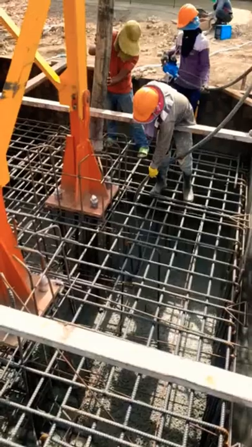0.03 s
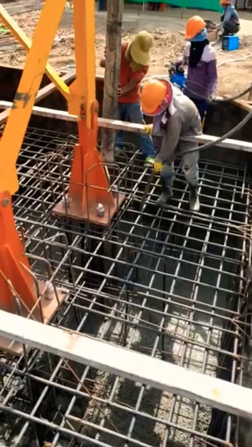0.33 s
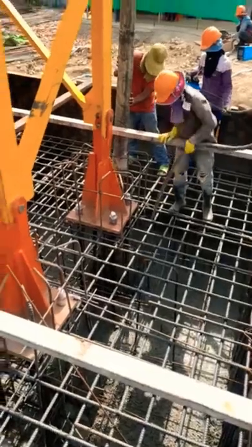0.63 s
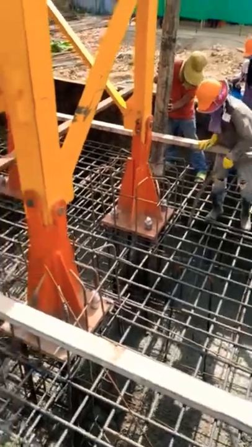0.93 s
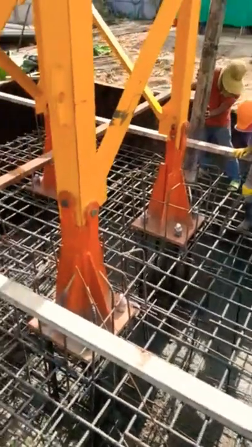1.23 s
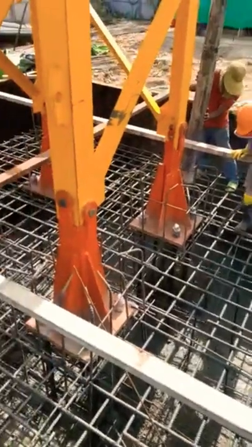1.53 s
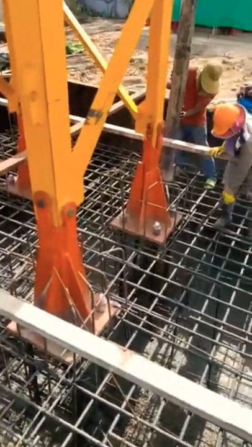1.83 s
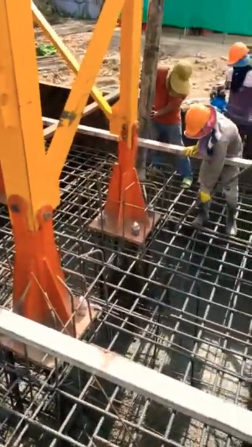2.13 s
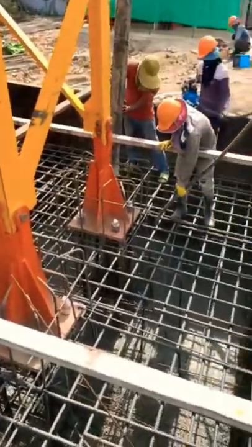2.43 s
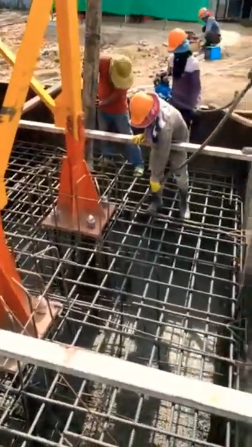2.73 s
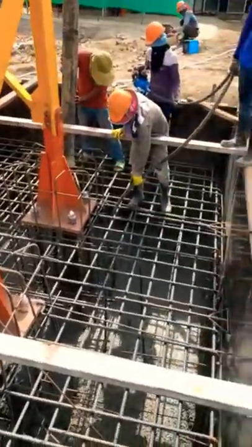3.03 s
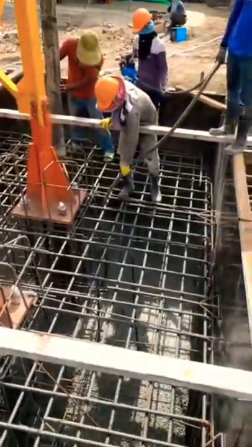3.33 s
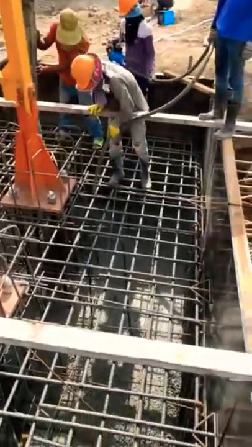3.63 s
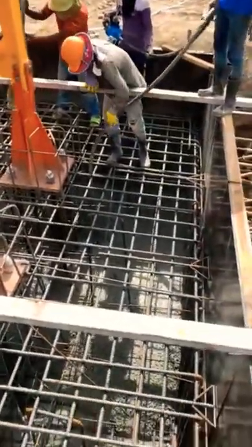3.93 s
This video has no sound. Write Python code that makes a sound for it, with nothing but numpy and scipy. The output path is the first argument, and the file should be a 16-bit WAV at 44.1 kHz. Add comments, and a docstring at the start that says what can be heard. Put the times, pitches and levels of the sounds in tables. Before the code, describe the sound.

A concrete poker vibrator hums and rattles against steel mesh over a rumbling engine.

```python
"""Concrete being compacted in a pit of reinforcing steel, outdoors, a few metres away.
From the start a poker vibrator hums at about 215 turns/s: the mesh sizzles, gravel churns, loose
bars clatter, and the small driving engine rumbles underneath. Hollow swells begin at 0.6 s; at 0.7 s
steel squeals on steel and a low groan falls. From 1.7 s the poker bears harder in short surges.
Two more groans follow at 2.2 and 2.7 s, and a second squeal at 3.9 s."""
import sys
import numpy as np
from scipy import signal
from scipy.fft import rfft, irfft
from scipy.io import wavfile

SR = 44100
rng = np.random.default_rng(int(sys.argv[2]) if len(sys.argv) > 2 else 0)


def unload_audio(sound):
    """Save the sound as a 16-bit wav file, at the path given as the first command line argument."""
    columns = np.transpose(np.atleast_2d(sound))
    # keep every value between -1 and 1, then stretch to whole-number steps
    steps = np.round(np.clip(columns, -1, 1) * 32767)
    wavfile.write(sys.argv[1], SR, steps.astype(np.int16))


N = 176400
T = np.arange(N) / SR


def amp(db):
    """dB to gain."""
    return 10 ** (np.asarray(db) / 20)


def unit(x):
    """Scale to unit rms."""
    return x / np.sqrt(np.mean(x ** 2) + 1e-20)


def curve(points):
    """Linear interpolation of (time_s, value) points."""
    return np.interp(T, *np.transpose(points))


def drift(rate_hz):
    """Smooth noise up to about rate_hz; unit rms."""
    hz = np.fft.rfftfreq(N, 1 / SR)
    spectrum = rfft(rng.standard_normal(N))
    return unit(irfft(spectrum * np.exp(-.5 * (hz / rate_hz) ** 2) * (hz > 0), N))


def angle(hz):
    """Running phase of a frequency curve, rad."""
    return 2 * np.pi * np.cumsum(hz) / SR


def smeared(phase, width_hz):
    """Tone blurred into a narrow band; unit rms."""
    return unit(drift(width_hz / 2) * np.cos(phase) + drift(width_hz / 2) * np.sin(phase))


def colour(x, points):
    """Minimum-phase filter through (freq_hz, gain_db) points; unit rms."""
    hz, db = np.transpose(points)
    log_hz = np.log(abs(np.fft.fftfreq(N, 1 / SR)) + 1)
    log_gain = np.log(amp(np.interp(log_hz, np.log(hz), db)))
    response = np.exp(np.conj(signal.hilbert(log_gain)))[:N // 2 + 1]
    return unit(irfft(rfft(x) * response, N))


def impacts(turn, per_s, spread_db, lock=.22):
    """Random blows of uneven size, crowding on one part of each turn."""
    chance = per_s / SR * (1 + lock * np.cos(turn))
    size = amp(spread_db * np.minimum(rng.exponential(1, N), 4))
    return (rng.random(N) < chance) * size * rng.choice([-1, 1], N)


def pit(blows, places, t60_s=.15, reflection_db=1):
    """Blows scattered over places in the pit, each with its own short reflections."""
    t = T[:SR // 5]
    place = rng.integers(0, places, N)
    out = blows.copy()
    for k in range(places):
        tail = rng.standard_normal(len(t)) * np.exp(-np.log(1000) * t / t60_s)
        tail /= np.linalg.norm(tail)
        out += amp(reflection_db) * signal.oaconvolve(blows * (place == k), tail)[:N]
    return out


# Poker speed: time_s, speed_hz
POKER_SPEED = [(.13, 207.4), (.3, 216.7), (.5, 220.5), (.68, 211.9), (1.0, 215.6), (1.45, 216.5),
               (1.9, 212), (2.05, 214.4), (2.25, 210.2), (2.55, 215.2), (2.72, 213.4), (2.95, 217.9),
               (3.4, 217), (3.6, 213.4), (3.8, 218), (4, 221)]


def rotation(wobble_hz=2.2):
    """Angle of the poker's spinning weight, rad."""
    return angle(curve(POKER_SPEED) + wobble_hz * drift(10))


# Fundamental, before trim: time_s, level_db
HUM_LEVEL = [(.14, -29), (.21, -27.5), (.32, -31.5), (.41, -29.5), (.45, -37), (.51, -26), (.62, -38),
             (.72, -24), (.78, -38), (.87, -43), (.92, -37), (1.0, -25), (1.08, -33), (1.16, -24.5),
             (1.23, -37), (1.3, -31), (1.55, -24), (1.8, -24.5), (1.92, -18), (1.98, -30), (2.06, -20),
             (2.22, -23.5), (2.32, -31.5), (2.4, -23), (2.48, -31), (2.58, -19), (2.65, -34), (2.7, -23),
             (2.84, -40), (2.92, -19.5), (3.1, -23.5), (3.45, -26), (3.49, -40), (3.59, -23), (3.66, -35),
             (3.81, -17), (3.91, -33), (3.98, -20.5)]
# Second harmonic: time_s, level_db
OCTAVE_LEVEL = [(.13, -48), (.54, -49.5), (.75, -36), (.95, -41.5), (1.25, -42), (2.25, -45), (2.6, -42),
                (2.93, -37), (3.2, -44), (3.45, -50), (3.57, -35), (3.75, -37), (3.9, -42), (4, -41)]


def poker(turn, trim_db=-4, flutter_db=1.13, edge_db=-40):
    """The spinning weight hums, with a rough edge and a rough octave."""
    tone = unit(np.sin(turn) * amp(flutter_db * drift(15)))
    hum = amp(curve(HUM_LEVEL) + trim_db) * tone
    edge = amp(edge_db) * smeared(turn, width_hz=30.4)
    octave = amp(curve(OCTAVE_LEVEL)) * smeared(2 * turn, width_hz=26)
    return hum + edge + octave


# Steady rattle: time_s, gain_db
CONTACT_GAIN = [(.13, -2), (.27, -2.5), (.33, 0.5), (.45, -1.7), (.68, -1), (.8, -0.5), (.93, -1),
                (1.03, 1.8), (1.12, -2.5), (1.3, -3), (1.39, -1), (1.46, -2), (1.55, -1.8), (1.68, -2),
                (1.76, -1), (1.93, 2.5), (2.1, 0), (2.35, 0), (2.45, -4), (2.57, -1.5), (2.63, -0.1),
                (2.8, -0.1), (2.95, -3.5), (3.08, -1), (3.25, -1), (3.36, -0.3), (3.47, -0.5), (3.6, 1.3),
                (3.69, -0.8), (3.79, .7), (3.83, -2.5), (3.91, 0), (4, -1)]
# Harder contact: peak_s, half_width_s, boost_db
CONTACT_SURGES = [(1.739, 0.019, 3), (2.149, 0.018, 2.5), (2.702, 0.024, 4), (2.878, .028, 2.5),
                  (3, 0.041, 6), (3.137, 0.019, 1), (3.74, 0.017, 4)]


def contact():
    """How hard the poker bears on the steel, dB."""
    surges_db = sum(db * np.exp(-((T - peak_s) / half_s) ** 2) for peak_s, half_s, db in CONTACT_SURGES)
    return curve(CONTACT_GAIN) + surges_db


# Ringing steel: freq_hz, gain_db
STEEL_SPECTRUM = [(600, -27), (1400, -8.5), (2200, -2), (3000, -5), (4200, -2.5), (4600, -6), (4930, -8.5),
                  (5400, -6), (5800, -1), (6400, 1), (7500, 1.5), (8300, 0), (8900, -9)]


def mesh(turn, contact_db, base_db=-25, flicker_db=.88):
    """Dense strikes on the steel mesh merge into a sizzle that follows the contact."""
    strikes = pit(impacts(turn, per_s=6500, spread_db=1.5), places=14)
    return colour(strikes, STEEL_SPECTRUM) * amp(base_db + contact_db + flicker_db * drift(14))


# Gravel and formwork: freq_hz, gain_db
GRAVEL_SPECTRUM = [(150, -12.5), (300, -0.5), (400, 4.5), (500, 3.5), (650, -1.5), (770, -2.5), (900, -1),
                   (1400, 0), (1750, -3), (2200, -3.5), (2900, -12.5), (4500, -24.5)]
# Churning of gravel and loose bars, before trim: time_s, level_db
CHURN_LEVEL = [(.13, -33.5), (.25, -34.5), (.37, -32.5), (.5, -33), (.68, -31.5), (.78, -33), (1.0, -33.5),
               (1.27, -34.5), (1.6, -32.5), (1.99, -31), (2.33, -32), (2.45, -33), (2.55, -32), (2.65, -31),
               (2.94, -34), (3.01, -33.5), (3.25, -33), (3.33, -31), (3.47, -33.5), (3.7, -32),
               (3.92, -30.5), (4, -32)]


def gravel(turn, contact_db, trim_db=2.5, follow=.27, flicker_db=.9):
    """Gravel knocks in the formwork, slightly louder under harder contact."""
    knocks = pit(impacts(turn, per_s=2000, spread_db=2), places=10)
    level_db = curve(CHURN_LEVEL) + trim_db + follow * contact_db + flicker_db * drift(12)
    return colour(knocks, GRAVEL_SPECTRUM) * amp(level_db)


def clatter(turn, bars=32, low_hz=907, high_hz=1691, t60_s=.039, trim_db=-7.5):
    """Sparse knocks on loose bars; each rings briefly at its own pitch."""
    t = T[:SR // 10]
    envelope = np.sqrt(t) * np.exp(-np.log(1000) * t / t60_s)
    out = np.zeros(N)
    for hz in np.geomspace(low_hz, high_hz, bars):
        ring = envelope * np.sin(2 * np.pi * hz * t)
        out += signal.oaconvolve(impacts(turn, per_s=5, spread_db=2.5), ring)[:N]
    return unit(out) * amp(curve(CHURN_LEVEL) + trim_db)


# Engine tones: shaft_order, level_db
ENGINE_ORDERS = [(1, -39.5), (2, -47), (5, -44.5), (9, -51.5)]
# Engine rumble: freq_hz, gain_db
RUMBLE_SPECTRUM = [(10, -27), (25, -17), (38, -5), (52, 0.5), (70, 1.5), (100, 3), (140, -0.5), (190, 1),
                   (245, -1.5), (310, -9.5), (500, -38), (1500, -67.5)]
# Rumble, before trim: time_s, level_db
RUMBLE_ENVELOPE = [(0.15, -29.5), (0.25, -32.5), (0.89, -28.5), (0.94, -31.5), (1.12, -29.5), (1.24, -34.5),
                   (1.53, -25.5), (1.59, -29.5), (2.24, -29.5), (2.3, -29), (2.33, -31.5), (2.82, -29),
                   (2.84, -30.5), (3.03, -30), (3.23, -33.5), (3.4, -28), (3.48, -32), (3.98, -31.5)]


def engine(shaft_hz=57.8, waver=.01163, flutter_db=2.5, rumble_trim_db=1.26):
    """Wavering shaft orders in a low, lumpy rumble."""
    shaft = angle(shaft_hz * (1 + waver * drift(1.45)))
    tones = np.zeros(N)
    for order, db in ENGINE_ORDERS:
        tone = np.sin(order * shaft + 2 * np.pi * rng.random())
        tones += amp(db) * unit(tone * amp(flutter_db * drift(3.1)))
    rumble = colour(rng.standard_normal(N), RUMBLE_SPECTRUM)
    return tones + rumble * amp(curve(RUMBLE_ENVELOPE) + rumble_trim_db)


# Hollow swells: peak_s, half_width_s, pitch_hz, level_db
SWELLS = [(.63, 0.019, 408, -28), (2.429, 0.019, 428, -29), (2.558, 0.028, 425, -26.5),
          (2.689, .025, 425, -30), (3.022, 0.022, 432, -29.5), (3.1, 0.012, 433, -31),
          (3.409, 0.03, 434, -34), (3.815, 0.023, 404.3, -28)]


def swells():
    """Short hollow tones near the hum's octave."""
    out = np.zeros(N)
    for peak_s, half_s, hz, db in SWELLS:
        envelope = np.exp(-((T - peak_s) / half_s) ** 2)
        out += amp(db) * envelope * unit(np.sin(2 * np.pi * (hz * T + rng.random())))
    return out


# Steel rubbing: start_s, length_s, level_db
RUBS = [(0.713, 0.22, -29), (3.916, 0.21, -26.5)]
# Squeal partials: pitch_hz, gain_db
RUB_PARTIALS = [(6345, 0), (5663, -8)]


def squeals(waver_hz=12, roughness=.55):
    """Thin wavering tones swell and fade as steel rubs on steel."""
    envelope = np.zeros(N)
    for start_s, length_s, db in RUBS:
        envelope += amp(db) * np.sin(np.pi * np.clip((T - start_s) / length_s, 0, 1))
    tones = np.zeros(N)
    for hz, db in RUB_PARTIALS:
        phase = angle(hz + waver_hz * drift(17))
        tones += amp(db) * unit(np.sin(phase) + roughness * smeared(phase, width_hz=190))
    return envelope * tones


# Groans: start_s, length_s, start_pitch_hz, level_db
FALLING_TONES = [(.72, 0.16, 243, -28), (2.176, 0.19, 208, -31.5), (2.671, 0.123, 214.8, -28)]


def groans(sag=.67, bend_power=3.8):
    """Low tones hold their pitch, then slide down as they fade."""
    out = np.zeros(N)
    for start_s, length_s, hz, db in FALLING_TONES:
        progress = np.clip((T - start_s) / length_s, 0, 1)
        phase = angle(hz * (1 - sag * progress ** bend_power)) + 2 * np.pi * rng.random()
        envelope = np.sqrt(4 * progress * (1 - progress))
        out += amp(db) * envelope * unit(np.sin(phase))
    return out


def scene():
    """Mono mix; the poker's rotation drives both hum and rattle."""
    turn = rotation()
    contact_db = contact()
    hum = poker(turn)
    rattle = mesh(turn, contact_db) + gravel(turn, contact_db) + clatter(turn)
    return (hum + rattle + engine() + swells() + squeals() + groans())[None]


def record(dry, start_s=.13, rise_s=.002, cutoff_hz=8950):
    """Abrupt onset, steep low-pass."""
    gate = np.clip((T - start_s) / rise_s, 0, 1)
    lowpass = signal.firwin(501, cutoff_hz, window=("kaiser", 9), fs=SR)
    return signal.oaconvolve(dry * gate, lowpass[None], "same")


dry = scene()
out = record(dry)
unload_audio(out)
```